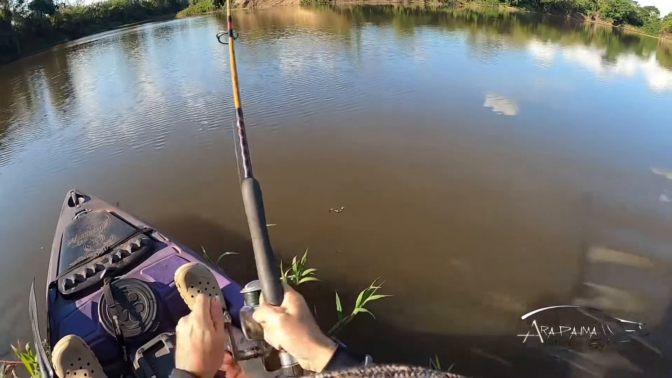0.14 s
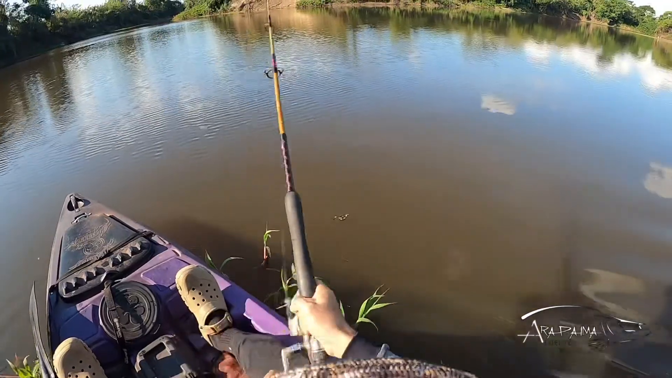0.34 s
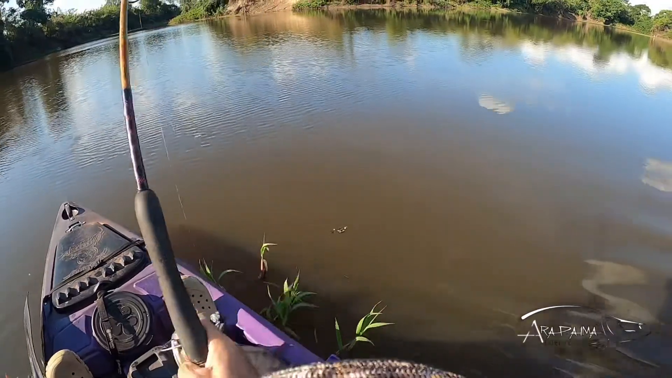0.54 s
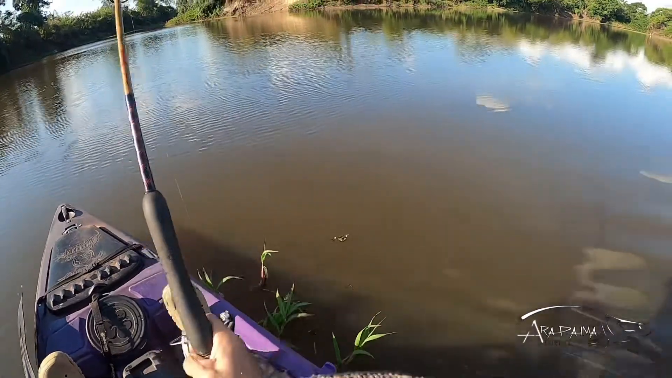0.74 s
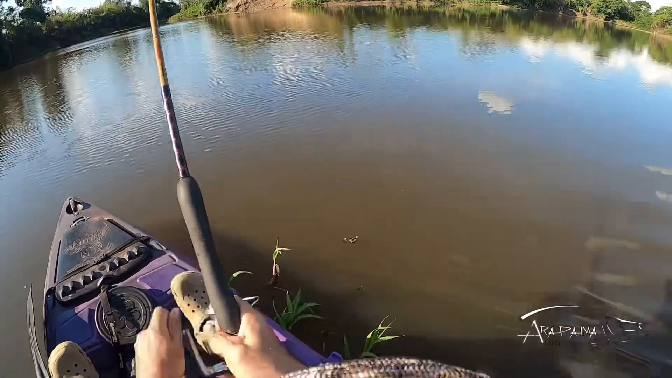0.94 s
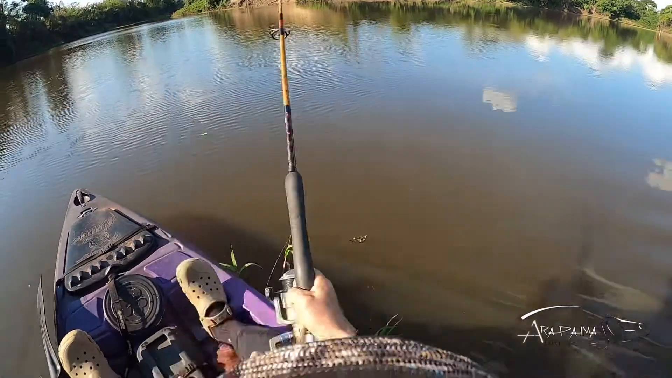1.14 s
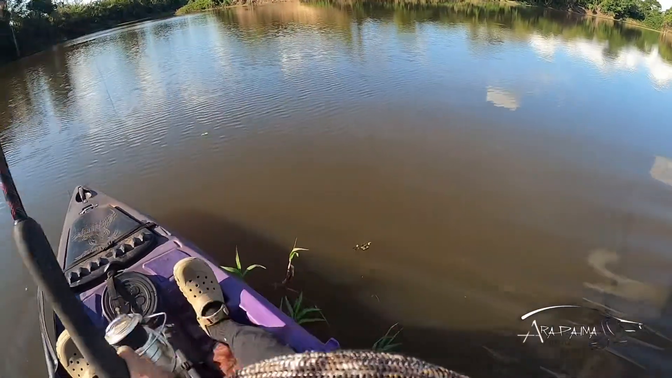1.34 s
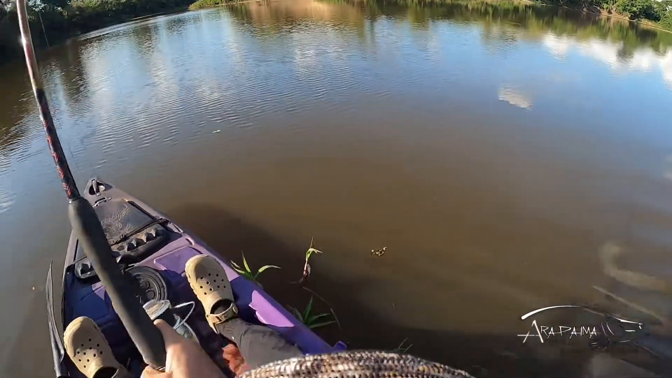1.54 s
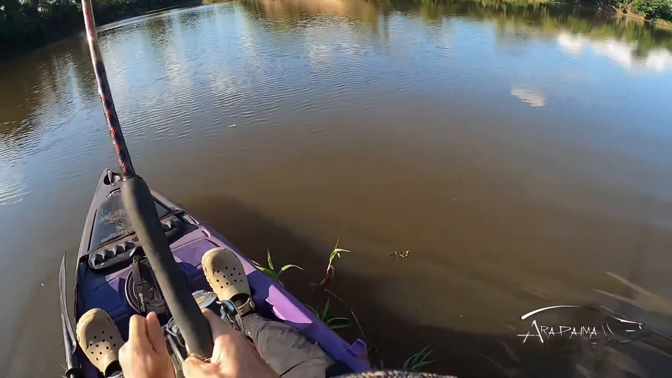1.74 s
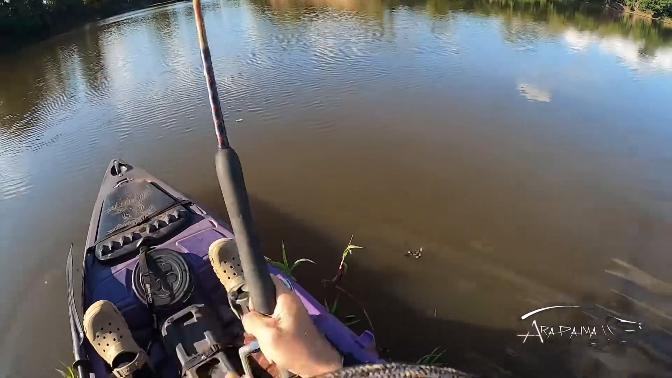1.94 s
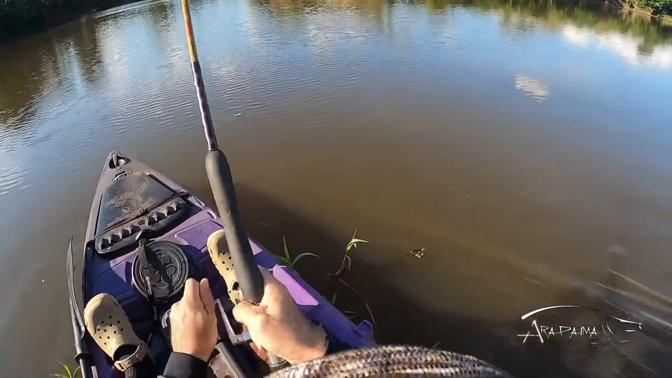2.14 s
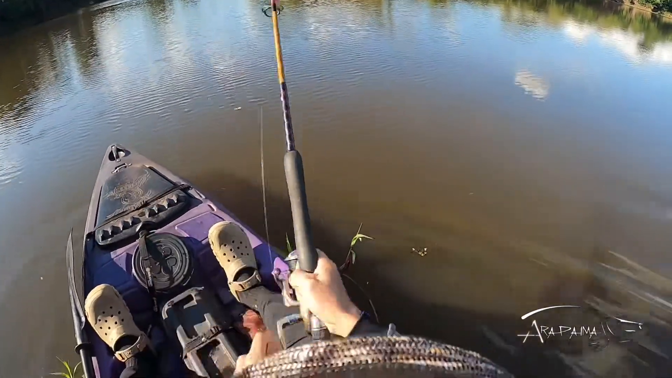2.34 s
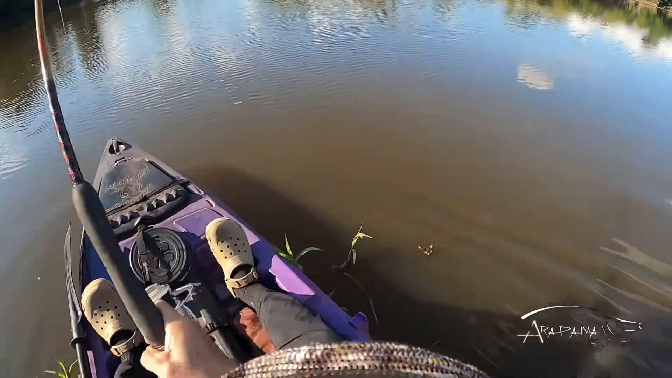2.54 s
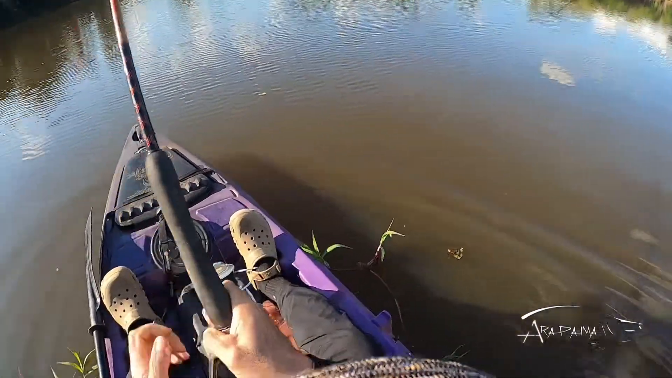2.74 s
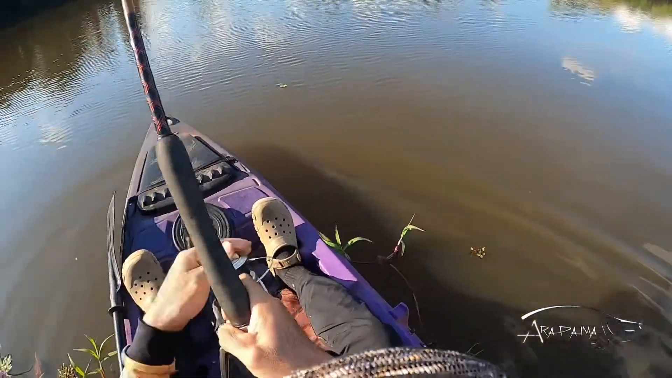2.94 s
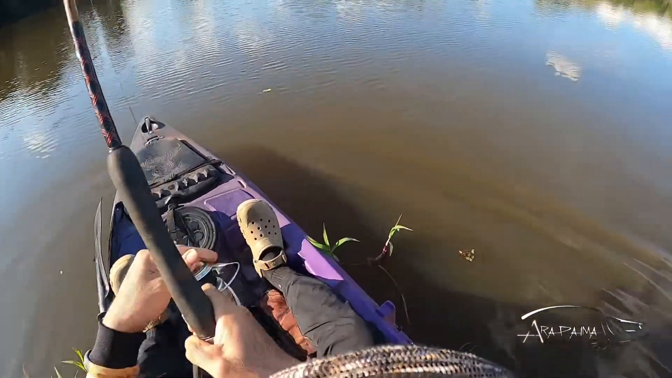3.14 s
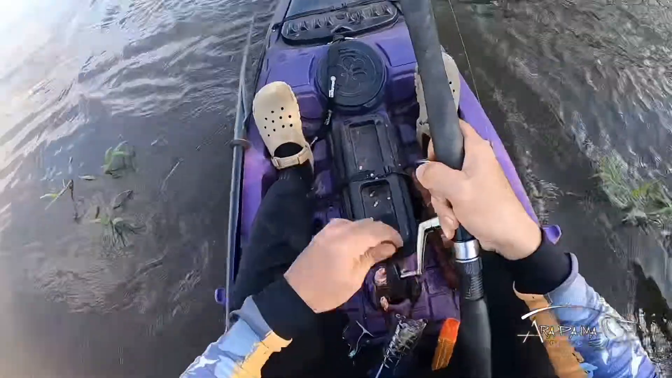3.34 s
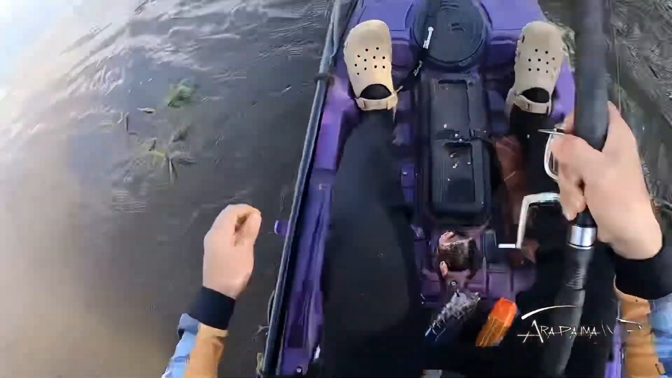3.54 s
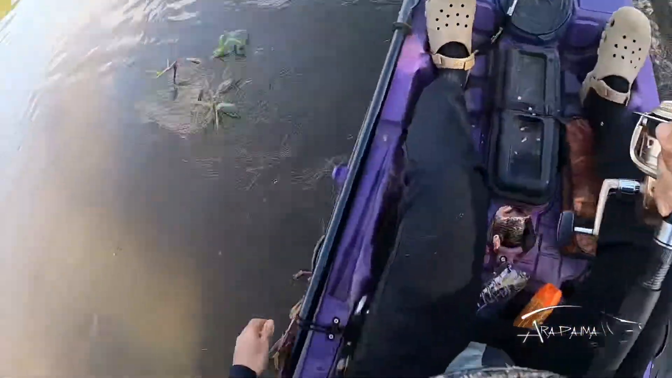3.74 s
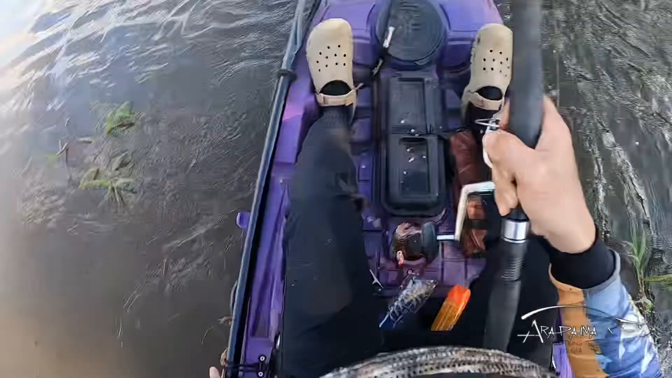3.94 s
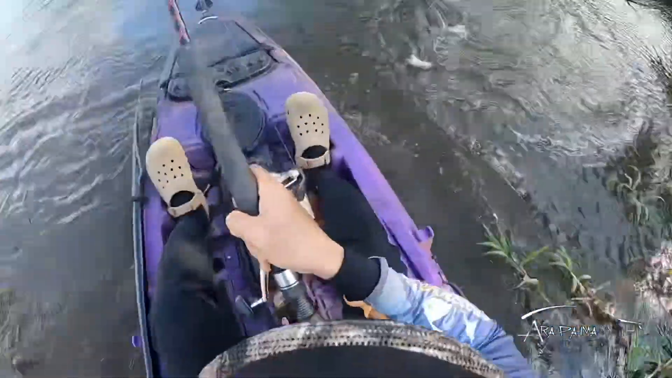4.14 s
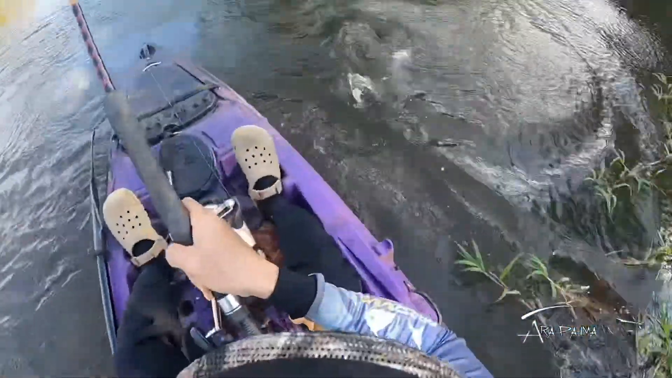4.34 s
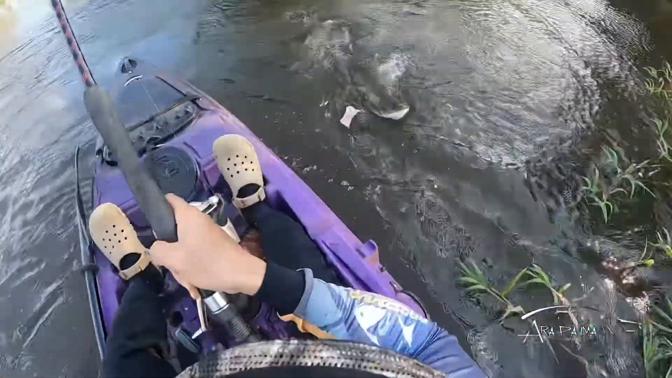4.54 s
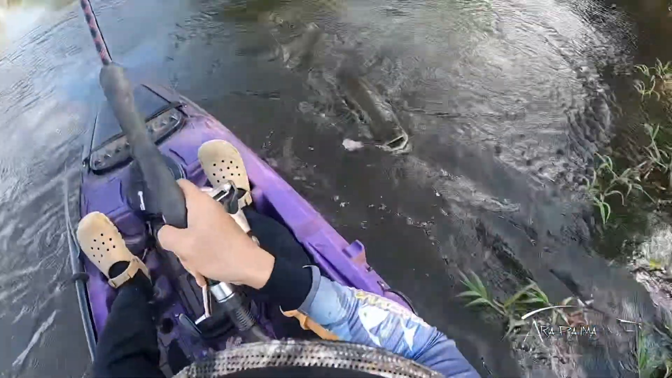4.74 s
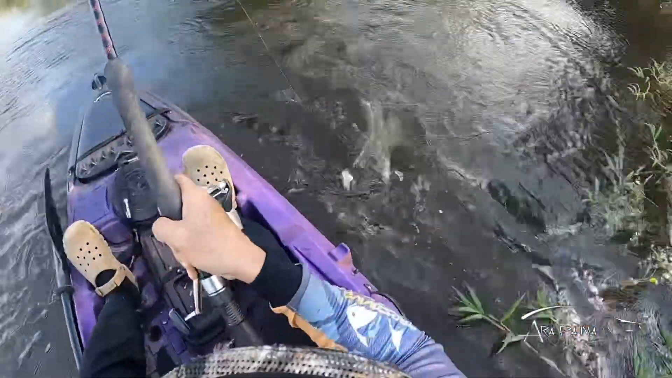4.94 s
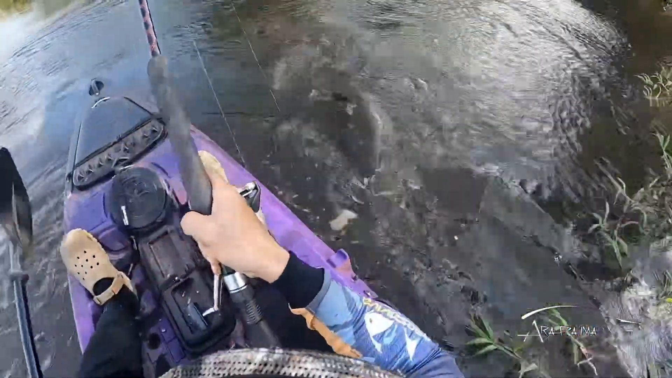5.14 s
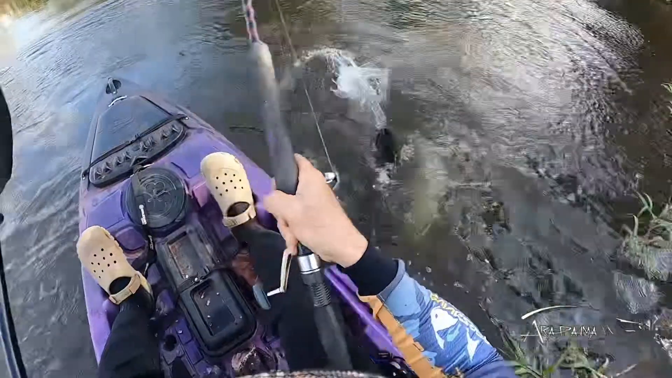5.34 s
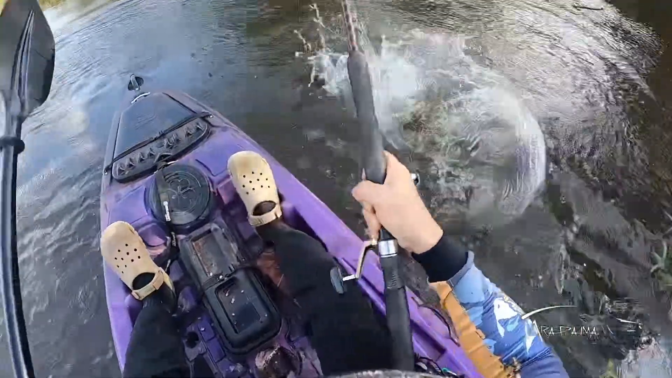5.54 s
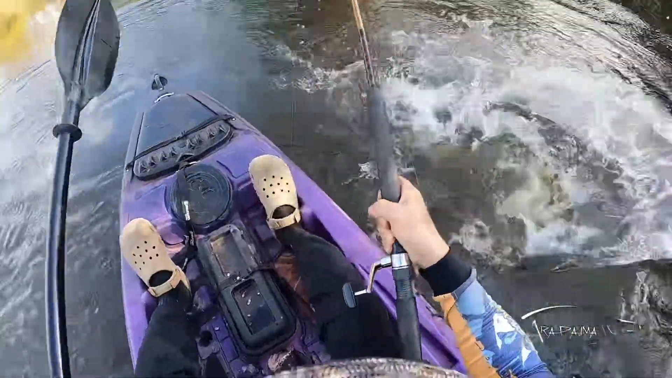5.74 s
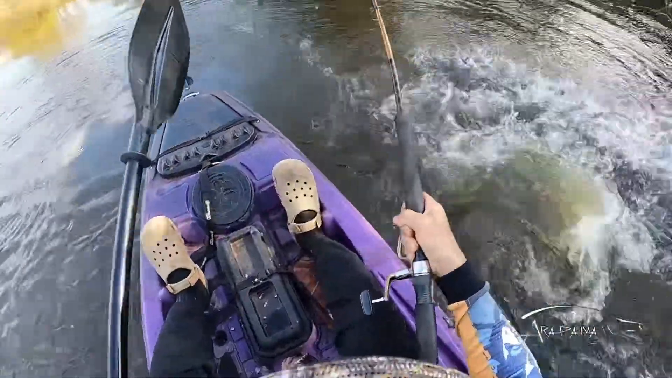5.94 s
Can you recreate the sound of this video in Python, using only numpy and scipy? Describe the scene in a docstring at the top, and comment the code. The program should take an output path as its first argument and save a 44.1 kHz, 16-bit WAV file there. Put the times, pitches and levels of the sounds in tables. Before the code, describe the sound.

An angler's hands work a reel very near the microphone: grainy rattling, tackle knocks, small creaky squeaks and cloth rubbing over a barely audible river wash. After some metal ticking, a low bump and a few splashes arrive. A large fish rolls beside the plastic hull with plops, clear droplets and dull thumps, then thrashes loudly in dense bubbling spray, slightly to the right.

```python
"""Calm river, kayak: an angler winds a reel, then a big hooked fish rolls and thrashes beside the hull.
Reel: random tooth clicks through body resonances; squeaks are gliding sines. Cloth: shaped, flickering noise.
Tackle knocks: noise crack plus dying ring. Metallic ticks, small bright knocks: scrapes that ring a bank of modes.
Fish: low noise sloshes, swarms of rising sines bubble, grains spray; gulps, thumps, slaps are gliding sines.
Drops: cracks with rising rings, clear plinks, ringless spits. Below all: a faint river wash and low rumble."""
import sys
import numpy as np
from scipy import signal
from scipy.fft import rfft, irfft, next_fast_len
from scipy.io import wavfile
from scipy.ndimage import uniform_filter1d

SR = 44100
rng = np.random.default_rng(int(sys.argv[2]) if len(sys.argv) > 2 else 0)


def master_out(mix):
    """Clip the mix to full scale and print it as 16-bit PCM to the path in sys.argv[1]."""
    frames = np.transpose(np.atleast_2d(mix))
    ceiling = np.clip(frames, -1, 1)
    pcm = np.round(ceiling * 32767).astype(np.int16)
    wavfile.write(sys.argv[1], SR, pcm)


N = 268039


def amp(db):
    """Gain of a level in dB."""
    return 10 ** (np.asarray(db) / 20)


def rms_one(x):
    """Scale to unit rms."""
    return x / np.sqrt(np.mean(x ** 2) + 1e-20)


def gains(rows):
    """Gain in time of every dB column; -120 dB outside, but a table that ends after 6 s holds its last level."""
    t_s, *columns = np.transpose(rows)
    now_s = np.arange(N) / SR
    return [amp(np.interp(now_s, t_s, db, left=-120, right=db[-1] if t_s[-1] > 6 else -120))
            for db in columns]


def swells(times_s, levels_db, attack_s, t60_s):
    """Gain in time of events that rise linearly and die exponentially; the strongest wins."""
    out, t = np.zeros(N), np.arange(SR) / SR
    shape = np.minimum(t / attack_s, 1) * amp(-60 * np.maximum(t - attack_s, 0) / t60_s)
    for t_s, level_db in zip(times_s, levels_db):
        i = round(max(t_s, 0) * SR)
        out[i:i + SR] = np.maximum(out[i:i + SR], amp(level_db) * shape[:N - i])
    return out


def drift(rate_hz):
    """Slow random wander of unit rms: noise through a double real pole, drawn at SR / 20."""
    r = np.exp(-40 * np.pi * rate_hz / SR)
    noise = rng.standard_normal(N // 20 + 4002)
    slow = signal.lfilter([1], [1, -2 * r, r * r], noise)[4000:]
    return np.interp(np.arange(N) / 20, np.arange(len(slow)), rms_one(slow))


def resonate(x, hz, width_hz):
    """Two-pole resonance, about unit gain at its peak."""
    r = np.exp(-np.pi * width_hz / SR)
    zeros = np.array([1, 0, -1]) * (1 - r * r) / 2
    return signal.lfilter(zeros, [1, -2 * r * np.cos(2 * np.pi * hz / SR), r * r], x)


def grains(per_s, spread_db):
    """Random clicks of uneven size and either sign."""
    sizes = amp(spread_db * np.minimum(rng.exponential(1, N), 5)) * rng.choice([-1, 1], N)
    return sizes * (rng.random(N) < per_s / SR) + 1e-18


def coloured(source, spectrum):
    """A source shaped by a spectrum, interpolated in dB over log f."""
    hz, level_db = np.transpose(spectrum)
    size = next_fast_len(N)
    bins_hz = np.arange(size // 2 + 1) * SR / size
    colour = amp(np.interp(np.log(bins_hz + 1), np.log(hz), level_db, -120, -120))
    return irfft(rfft(source, size) * colour, size)[..., :N]


def patchy(source, spectrum, patchy_db, rate):
    """A coloured source split in bands that flicker partly together, partly alone; rms 1."""
    source = coloured(source, spectrum)
    low_hz, high_hz = spectrum[0][0], spectrum[-1][0]
    edges_hz = low_hz * 2 ** np.arange(0, np.log2(high_hz / low_hz) + .7, .7)
    together, out = drift(rate), 0
    for k, (low, high) in enumerate(zip(edges_hz, edges_hz[1:])):
        sos = signal.butter(2, [low, min(high, .45 * SR)], "band", fs=SR, output="sos")
        band = signal.sosfilt(sos, source)
        flicker = amp(patchy_db * (.5 * together + drift(rate)))
        out = out + (-1) ** k * band * flicker   # alternate signs join the bands flat
    return rms_one(out)


def place(x, pan_db, lag_s, side=0):
    """Two close ports: L-R level step, left delayed, side part in opposite sign."""
    late = np.interp(np.arange(N) - lag_s * SR, np.arange(N), x)
    return np.array([(late + side) * amp(pan_db / 2), (x - side) * amp(-pan_db / 2)])


def glides(table):
    """Sines that swell, die and slide; they stop after 1/9 s, or sooner after a climb of 2.4 octaves."""
    out, t = np.zeros(N + SR), np.arange(SR // 9) / SR
    for t_s, swell_s, t60_s, first_hz, rise, level_db in table:
        turns = np.cumsum(first_hz * 2 ** (rise * t)) / SR
        stop_s = min(t[-1], 2.4 / max(rise, 1))
        shape = np.minimum(t / swell_s, 1) * amp(-60 * np.maximum(t - swell_s, 0) / t60_s)
        shape = shape * np.clip((stop_s - t) / 0.014, 0, 1)
        out[round(max(t_s, 0) * SR):][:len(t)] += amp(level_db) * shape * np.sin(2 * np.pi * turns)
    return out[:N]


def hits(table, rise, rough, crack_t60, crack_width, swell, snap):
    """Each hit is a short noise crack and a dying ring; a ring of air in water rises in pitch."""
    out, t = np.zeros((2, N)), np.arange(SR // 12) / SR
    noise = rng.standard_normal((len(table), 3, len(t)))
    for (t_s, level_db, ring_hz, t60_s, crack_db, crack_hz, pan_db), (a, *b) in zip(table, noise):
        tone = np.sin(2 * np.pi * np.cumsum(ring_hz * 2 ** (rise * t)) / SR)
        grit = rms_one(resonate(resonate(a, ring_hz, ring_hz), ring_hz, ring_hz))
        body = (tone + rough * grit) / (1 + rough)
        body = body * amp(-60 * t / max(t60_s, .005)) * np.minimum(t / swell, 1)

        crack = b[0] + .5 * np.array(b)   # partly shared by the ports
        crack = crack * amp(-60 * t / crack_t60) * np.minimum(.3 + t / .002, 1)
        crack[:, 0] += snap   # first contact
        crack = resonate(resonate(crack, crack_hz, crack_hz), crack_hz, crack_width * crack_hz)
        crack = amp(crack_db) * crack / np.abs(crack).max()

        burst = amp(level_db) * (body + crack) * amp([[pan_db / 2], [-pan_db / 2]])
        i, lag = round(t_s * SR), round(-pan_db / 2)   # lag in samples: the weaker port hears it later
        out[0, i + lag:][:len(t)] += burst[0]
        out[1, i:][:len(t)] += burst[1]
    return out


# quiet river all around: f/Hz, relative level/dB per Hz
RIVER_SPECTRUM = [(65, -52), (110, -12), (167, 7.5), (223, -2), (480, -7), (683, -19), (1040, -32),
                  (4810, -10), (7700, -11.5), (11000, -23.5), (15700, -28)]


def river():
    """Steady faint noise wash, mostly alike in both ports."""
    shared, own = rms_one(coloured(rng.standard_normal((2, N)), RIVER_SPECTRUM)) * amp(-69.5)
    return place(shared, pan_db=-1.5, lag_s=0, side=np.diff(own, prepend=0) * amp(-4.0))


# air and hull movement on the ports: t/s, level/dB
RUMBLE_LEVEL = [(0.0, -78), (0.03, -57), (0.2, -53), (0.5, -57.5), (0.74, -55), (.95, -58), (1.12, -71),
                (1.3, -46), (1.44, -41), (1.6, -67), (1.85, -78), (2.0, -58), (2.25, -78), (2.38, -57),
                (2.55, -54), (2.74, -52), (2.89, -73), (3.17, -71), (3.35, -45), (3.38, -48), (3.49, -31),
                (3.54, -49), (3.93, -43), (3.99, -23), (4.11, -36.5), (4.2, -32), (4.33, -59), (4.57, -40),
                (4.62, -55), (4.72, -59), (4.81, -43), (5.23, -62), (5.37, -53), (5.52, -65), (6.08, -64)]
# independent 45-95 Hz part in each port, before scaling: t/s, level/dB
HULL_SHARE = [(3.8, -18), (4.3, -7.5), (6.08, -5)]


def rumble():
    """Lumpy low pressure; its lowest band is partly shared and stronger on the right."""
    lumps = rng.standard_normal((2, N)) * amp(5.3 * drift(15.0))
    low = signal.sosfilt(signal.butter(4, [27, 49], "band", fs=SR, output="sos"), lumps)
    low = np.array([low[0] * amp(-10.0), .5 * low[0] + .87 * low[1]])
    hull = signal.sosfilt(signal.butter(2, [45, 95], "band", fs=SR, output="sos"), lumps)
    low = low + hull * gains(HULL_SHARE)[0]
    return gains(RUMBLE_LEVEL)[0] * low / np.std(low.mean(axis=0))


# tackle knocks: t/s, ring level/dB, ring f/Hz, ring t60/s, crack re ring/dB, crack f/Hz, L-R/dB
TACKLE_KNOCKS = [(0.146, -38, 1250, 0.029, 5, 4440, -3), (0.217, -25, 1290, 0.027, -1, 2200, 0.5),
                 (0.435, -32.5, 1330, 0.0099, 9.5, 4640, 0.5), (0.49, -39, 1055, 0.057, -2, 3160, -1),
                 (0.725, -21, 1080, 0.0079, -11.5, 2300, 1), (0.7602, -34.5, 1185, 0.055, -8, 2660, 3),
                 (0.821, -22, 1170, 0.017, -11, 1920, 1), (0.852, -24.5, 1380, 0.011, -30, 2460, 3),
                 (0.883, -33, 1360, 0.061, -21, 2660, -3), (0.89, -23.5, 921, 0.097, -5, 2480, -1.5),
                 (1.023, -32, 1040, 0.036, -15, 2340, -1), (1.168, -36, 880, 0.078, 5, 2510, -3),
                 (1.273, -28, 1360, 0.031, 6, 5860, 1), (1.29, -21, 1150, 0.072, -14, 2100, 2),
                 (1.296, -19, 1108, 0.083, -15, 2030, -0.5), (1.522, -16.5, 1430, 0.011, -21, 2020, 2),
                 (1.539, -37.5, 1250, 0.044, -4, 2670, 3), (1.902, -51, 1360, 0.05, 13, 2750, -1),
                 (1.99, -35.5, 1370, 0.048, 0, 4100, 0.5), (2.031, -33.5, 1210, 0.026, 1, 2700, -1.5),
                 (2.097, -34.5, 1220, 0.021, -18, 2300, 0.5), (2.155, -37.5, 1250, 0.21, 1, 2300, 1),
                 (2.373, -30.5, 1740, 0.02, 4.5, 3800, -0.5), (2.524, -27.5, 950, 0.022, -2.5, 3000, -0.5),
                 (2.702, -40, 1200, 0.03, 2.5, 2400, 3), (2.73, -18, 1040, 0.0058, -17, 2100, 2.5),
                 (3.262, -42.5, 1320, 0.027, 8, 4000, -4.5), (3.378, -30.5, 1110, 0.065, 2.5, 4400, -3),
                 (3.4036, -36.5, 1030, 0.05, 16.5, 6370, -3), (3.52, -32.5, 1550, 0.034, -24, 2130, 3),
                 (3.69, -24, 1510, 0.02, -5, 2570, -2), (3.723, -29, 1250, 0.033, -4.5, 3040, -2.5),
                 (3.769, -29, 934, 0.078, -24, 2190, -3.5), (3.83, -33.5, 1053, 0.089, -22, 2040, -3)]


def knocks():
    """Tackle knocks: hard contact cracks, then a rough ring of steady pitch dies."""
    return hits(TACKLE_KNOCKS, rise=0, rough=0.56, crack_t60=0.021, crack_width=0.78, swell=0.00026, snap=8.1)


# winding, before mix trims: t/s, whirr level/dB, rustle level/dB, rub level/dB
WINDING = [(0.0, -53, -39, -61.5), (0.16, -38.5, -48, -56), (0.4, -47, -48, -57.5), (0.55, -48, -48, -54),
           (0.79, -60, -62.5, -65), (0.95, -45, -49.5, -54.5), (1.28, -46.5, -47.5, -49),
           (1.4, -54, -53, -48), (1.58, -52, -58.5, -56), (1.78, -50, -48, -59), (2.12, -46.5, -50, -58),
           (2.35, -44.5, -47.5, -56), (2.56, -47, -52.5, -50.5), (2.68, -61, -54, -59),
           (2.83, -44, -51.5, -52), (3.03, -55.5, -75, -67.5), (3.31, -108, -55, -72.5),
           (3.44, -65, -60, -67), (3.6, -40, -43, -58), (3.76, -43, -46, -55), (3.87, -57, -78, -61)]
# rod jerks shake reel and cloth, before mix trims: t/s, reel level/dB, cloth level/dB
ROD_JERKS = [(0.0, -57, -57), (.21, -53, -42), (.43, -76, -59), (0.853, -31, -64), (1.283, -31, -36),
             (2.505, -53, -47), (3.256, -43.5, -43), (3.379, -66, -40.5), (3.62, -41, -58)]


def hand_levels():
    """Gains of whirr, rub and rustle: winding plus jerks; every knock also thumps the cloth."""
    whirr, rustle, rub = gains(WINDING)
    t_s, reel_db, cloth_db = np.transpose(ROD_JERKS)
    shaken = swells(t_s, reel_db, attack_s=0.016, t60_s=0.32)
    jerked = swells(t_s, cloth_db, attack_s=0.016, t60_s=0.32)
    t_s, knock_db = np.transpose(TACKLE_KNOCKS)[:2]
    thumped = swells(t_s, knock_db - 22, attack_s=0.0035, t60_s=0.069)
    return whirr + shaken, rub + shaken * amp(-8.5) + thumped, rustle + jerked


# reel body resonances: f/Hz, width/Hz, relative level/dB
REEL_BODY = [(1240, 350, 19), (1000, 420, 8.5), (1187, 34, 14), (1318, 46, 23.5), (1670, 39, 12),
             (2540, 880, 5.5), (2596, 48, 9.5), (4140, 270, 2.5), (8000, 670, -29)]
# low cloth rub: f/Hz, relative level/dB per Hz
RUB_SPECTRUM = [(90, -35), (125, -9), (160, 0.5), (260, -1.5), (500, -1), (800, -7.5), (1100, -4)]
# high cloth rustle: f/Hz, relative level/dB per Hz
RUSTLE_SPECTRUM = [(700, -12), (1300, 11), (2000, 8.5), (4070, 2), (5540, -0.5), (7600, -5), (9000, -11.5),
                   (12300, -22.5), (15800, -45)]
# reel under load: t/s, t60/s, first f/Hz, rise/(octave/s), level/dB before panning
REEL_SQUEAKS = [(.0, 0.079, 3660, 2.5, -43), (.0, 0.071, 1060, 8.5, -38), (0.02, 0.17, 1203, 2, -38.5),
                (0.018, 0.13, 1275, 10, -37), (.025, 0.04, 2740, 4, -39.5), (0.164, 0.079, 1640, 7, -40.5),
                (.235, 0.45, 1037, 3, -37), (.258, 0.11, 2660, 1.5, -43), (.275, 0.06, 1072, 1, -28),
                (0.279, 0.065, 2685, -1.5, -42.5), (.285, .07, 1530, 4, -40), (.303, 0.051, 2690, 0.5, -45),
                (.315, 0.07, 1314, -0.5, -39), (0.339, 0.043, 1196, -1, -43),
                (.758, 0.049, 1184, -1.5, -34), (0.859, 0.081, 1500, 0.5, -29.5),
                (0.876, 0.1, 1428, -0.8, -28.5), (0.885, 0.08, 845, 2.5, -22.5),
                (1.29, 0.03, 1265, 6, -20.5), (1.808, 0.017, 3020, 5.5, -38.5),
                (1.808, 0.026, 1580, 2, -40), (1.935, 0.014, 1830, 4, -41),
                (2.262, 0.055, 1200, 4.5, -35.5), (2.261, 0.07, 2565, 3.5, -42.5),
                (2.645, 0.034, 1215, 0, -42), (2.966, 0.062, 1440, 0.5, -48), (3.461, 0.028, 1660, 7, -41)]


def hands():
    """Gear teeth rattle the reel body, which squeaks under load; cloth rubs low and rustles high."""
    whirr, rub, rustle = hand_levels()
    teeth = grains(1200 * amp(5.0 * drift(14)), 0.51)
    reel = 0
    for k, (hz, width_hz, db) in enumerate(REEL_BODY):
        mode = resonate(resonate(teeth, hz, 3 * width_hz), hz, width_hz)
        reel = reel + (-1) ** k * amp(db) * mode
    reel = rms_one(reel)
    cloth = patchy(rng.standard_normal(N), RUB_SPECTRUM, patchy_db=4.0, rate=33.0)
    rustling = [grains(5000, 2.23), grains(7900, 5.97)]
    bright, around = rustle * patchy(rustling, RUSTLE_SPECTRUM, patchy_db=3.0, rate=24.0)
    squeaks = glides([(t_s, 0.0092, t60_s, hz, rise, db) for t_s, t60_s, hz, rise, db in REEL_SQUEAKS])

    turned = np.interp(np.arange(N) / SR, [3.2, 3.251], [0, 1])   # the reel swings to the right
    near = whirr * reel * amp(-5.0) + rub * cloth * amp(-6.0 * turned) + bright * amp(3.0) + squeaks
    side = np.diff(around, prepend=0) * amp(-18.5) + around * amp(-27.0)
    return place(near, pan_db=1.73 - 5.7 * turned, lag_s=5.5e-5 * turned, side=side)


# modes of the metal: f/Hz, relative level/dB, t60/s
METAL_MODES = [(4060, -1, .024), (4600, -4, .016), (5310, 0, .018), (6580, -4, .04), (7200, -4, .014),
               (7620, -6, .018), (8500, -8, .012), (10700, -9, .014), (12300, -11, .012)]
# metallic ticks and small bright knocks of reel and tackle:
# t/s, level/dB, f of the mode struck hardest/Hz, scrape re ring/dB
BRIGHT_TICKS = [(.802, -47, 5310, 3), (1.2445, -43, 8000, 6), (2.11, -43, 4060, -6), (2.484, -40, 4600, 0),
                (2.7846, -31, 6580, -20), (2.8, -28.5, 4900, -1), (2.8224, -40, 7620, -9),
                (2.829, -27, 4060, -14), (2.8455, -31, 4060, -10), (2.8547, -35, 6580, -3),
                (2.8656, -34, 4060, -12), (2.887, -39, 7500, 1), (2.8986, -37, 5310, 2),
                (2.909, -33, 6580, -20), (2.9245, -32, 6000, 0.5), (2.9424, -36, 5310, 2),
                (2.9588, -30, 5800, -4.5), (3.0207, -41.5, 7050, 6), (3.0535, -44, 6000, -7),
                (3.383, -28.5, 4600, -1)]
# metallic buzz between ticks: t/s, level/dB
METAL_CHATTER = [(2.79, -62), (2.805, -57), (2.85, -51), (2.9, -62)]


def ticks():
    """A tiny scrape rings the modes, most near the struck one; tackle knocks ring them too, and they buzz."""
    out, t = np.zeros(N), np.arange(SR // 12) / SR
    shaken = [(t_s, db + min(crack_db, 0) - 14, 1.5 * hz, -40)
              for t_s, db, _, _, crack_db, hz, _ in TACKLE_KNOCKS]
    table = BRIGHT_TICKS + shaken
    strengths_db = rng.normal(0, 4, (len(table), len(METAL_MODES)))
    scrapes = rng.standard_normal((len(table), len(t)))
    rough = .5   # uneven damping
    for (t_s, level_db, struck_hz, scrape_db), chances_db, scrape in zip(table, strengths_db, scrapes):
        rings = 0
        for (hz, db, t60_s), chance_db in zip(METAL_MODES, chances_db):
            far_db = 30 * abs(np.log2(hz / struck_hz))
            decay = amp(db + chance_db - far_db - 60 * t / t60_s)
            detuned_hz = hz * (1 + .012 * np.sin(chance_db))   # pitch shifts from blow to blow
            rings = rings + decay * np.sin(2 * np.pi * detuned_hz * t)
        unevenness = rms_one(uniform_filter1d(scrape[::-1], size=60))
        rings = rings / np.abs(rings).max() * (1 + rough * unevenness) / (1 + rough)
        rings = rings * np.minimum(t / 0.00099, 1)
        scraping = resonate(scrape * amp(-60 * t / 0.013), 5200, 3300) * amp(scrape_db)
        out[round(t_s * SR):][:len(t)] += amp(level_db) * (rings + scraping)

    clicks = grains(900, 3.6)
    buzz = sum(amp(db) * resonate(resonate(clicks, hz, hz / 2), hz, 4 / t60_s)
               for hz, db, t60_s in METAL_MODES[:7])
    out += gains(METAL_CHATTER)[0] * rms_one(buzz)
    return place(out, pan_db=2.0, lag_s=1e-5)


# clear single droplets: t/s, f/Hz, level/dB before panning
CLEAR_DROPLETS = [(3.672, 600, -43), (3.73, 1210, -38), (3.772, 1520, -37), (4.15, 2200, -42),
                  (4.172, 2370, -30.5), (4.192, 3880, -34), (4.305, 2440, -41), (4.356, 1060, -39.5),
                  (4.44, 1170, -36), (4.58, 3480, -37), (4.686, 920, -38), (4.697, 4130, -32),
                  (4.732, 2490, -31), (4.762, 3620, -44), (4.766, 3200, -42), (4.802, 2280, -40),
                  (4.83, 767, -37.5), (4.937, 940, -37), (4.955, 910, -39), (4.977, 3950, -34.5),
                  (4.988, 2030, -43), (4.995, 2180, -28), (5.018, 5450, -36.5), (5.048, 2350, -39),
                  (5.08, 1560, -42), (5.177, 2750, -33), (5.191, 2440, -37), (5.206, 1220, -38),
                  (5.252, 920, -38), (5.268, 2560, -32), (5.286, 4330, -31), (5.517, 3530, -27),
                  (5.523, 1410, -31), (5.527, 2510, -30), (5.545, 990, -29), (5.571, 1020, -23),
                  (5.588, 757, -15.5), (5.673, 2550, -36), (5.69, 640, -25), (5.729, 1470, -17.5),
                  (5.748, 1920, -30), (5.848, 1074, -19.5), (5.945, 4400, -27), (5.978, 2400, -25),
                  (5.994, 3920, -30), (6.013, 4700, -24.5)]


def plinks():
    """Clear droplets: sines that rise 3.2 octaves/s; low ones ring longer, 70 cycles of t60 at 2 kHz."""
    rows = [(t_s, 0.003, 70 / np.sqrt(2000 * hz), hz, 3.2, db) for t_s, hz, db in CLEAR_DROPLETS]
    return place(glides(rows), pan_db=-1.5, lag_s=4e-5)


# fine drops that only tick: t/s, level/dB before panning, f/Hz
FINE_DROPS = [(4.097, -18.5, 8500), (4.16, -39, 6000), (4.195, -42, 4500), (4.279, -34, 5500),
              (5.037, -40, 7000), (5.082, -38, 5970), (5.1255, -25, 8450), (5.129, -33, 6500),
              (5.17, -34, 3500), (5.18, -27, 8000), (5.213, -31, 4530), (5.219, -35, 6000),
              (5.243, -35, 6000), (5.252, -35, 5000), (5.272, -37, 4000), (5.293, -32, 6000),
              (5.328, -20, 4500)]


def spits():
    """Each fine drop is a bright crack; its ring lies 40 dB below."""
    rows = [(t_s, db - 40, 1000, .01, 40, hz, -3) for t_s, db, hz in FINE_DROPS]
    return hits(rows, rise=0, rough=0, crack_t60=0.0094, crack_width=0.3, swell=0.001, snap=1.5)


# drops and slaps on water: t/s, ring level/dB, ring f/Hz, ring t60/s, crack re ring/dB, crack f/Hz, L-R/dB
WATER_DROPS = [(3.882, -22, 1200, 0.029, -12, 3950, -2.5), (3.887, -21, 1190, 0.028, -14, 3620, 0.5),
               (3.903, -28, 1180, 0.033, -21, 3120, 2), (4.033, -32.5, 1820, 0.047, -29, 3160, -7),
               (4.097, -14.5, 4100, 0.01, -6.5, 3800, -3.5), (4.103, -20.5, 2260, 0.03, -21, 3460, -4.5),
               (4.152, -31, 1047, 0.11, -12, 4350, -3), (4.169, -17, 1035, 0.014, -17, 3890, -2.5),
               (4.175, -29, 1700, 0.042, -21, 3110, -5), (4.232, -35, 2280, 0.024, -17, 3700, -3),
               (4.295, -29.5, 840, 0.016, -11, 8300, -2), (4.342, -40.5, 1060, 0.036, 11, 4800, -3.5),
               (4.475, -29, 1610, 0.028, 5, 4570, -3), (4.513, -21, 1116, 0.057, -13, 3490, 3),
               (4.544, -24, 2000, 0.019, -8, 3050, 1.5), (4.577, -27, 2050, 0.034, 2.5, 3700, -1),
               (4.656, -32, 1390, 0.018, 0, 4460, 3), (4.695, -24, 2950, 0.015, -25, 4200, -1.0),
               (4.732, -24, 900, 0.032, -5, 3000, -3), (4.762, -32.5, 970, 0.042, 2.5, 3570, -1),
               (4.803, -29.5, 1520, 0.022, -12, 3130, -1), (4.843, -25.5, 3550, 0.014, -18, 3500, -3),
               (4.971, -22, 800, 0.024, -9, 3760, -2.5), (4.997, -13.5, 1490, 0.022, -29, 3710, -2.5),
               (5.019, -26.5, 1640, 0.026, 2, 3180, -3.5), (5.12, -25.5, 2260, 0.019, -18, 3240, -3),
               (5.143, -20.5, 2800, 0.015, -26, 3010, -2.5), (5.173, -24, 1150, 0.024, -4.5, 3000, -2.5),
               (5.198, -31, 1350, 0.015, 0, 3730, -1), (5.239, -35, 2210, 0.028, -10, 3170, -1),
               (5.258, -28.5, 2390, 0.04, -25, 3370, 1.5), (5.289, -29, 1070, 0.034, 5, 4370, -3.5),
               (5.302, -25, 2170, 0.029, -7, 8000, -1), (5.341, -14, 900, 0.021, 1, 3960, -1),
               (5.433, -17, 1680, 0.025, 0, 3700, -0.5), (5.462, -11.5, 816, 0.042, -29, 3420, -1),
               (5.599, -12.5, 1075, 0.059, -28, 3020, -2.5), (5.644, -16.5, 1540, 0.027, 3, 4430, -7),
               (5.77, -13.5, 1160, 0.089, -13, 4000, -4), (5.973, -11.5, 1050, 0.035, -4, 3250, -7)]


def drops():
    """Drops and slaps crack on the water; the enclosed air rings and rises in pitch."""
    return hits(WATER_DROPS, rise=10.8, rough=0.46, crack_t60=0.013, crack_width=0.74, swell=0.00057, snap=1.9)


# pockets at an even level: t/s, length/s, first f/Hz, rise/(octave/s), level/dB before panning
EVEN_POCKETS = [(4.031, 0.044, 222, 20, -27.5), (4.08, 0.04, 454, 17.5, -39.5),
                (4.225, .087, 174.4, 27.5, -36.5), (5.474, .02, 378, -7, -15.5)]


def bursts():
    """Singing air pockets burst: sines swell, hold, slide in pitch and stop short."""
    out = np.zeros(N)
    for t_s, length_s, first_hz, rise, level_db in EVEN_POCKETS:
        t = np.arange(round(length_s * SR)) / SR
        shape = np.clip(np.minimum(t / 0.0043, (length_s - t) / 0.0033), 0, 1)
        turns = np.cumsum(first_hz * 2 ** (rise * t)) / SR
        out[round(t_s * SR):][:len(t)] += amp(level_db) * shape * np.sin(2 * np.pi * turns)
    return out


STIRRED_S = 3.27   # the fish nears the hull


def bubbling(cycles, low_hz, octaves, rise, tilt_db, spread_db, count, start_s=STIRRED_S):
    """Bubbles ring a few cycles and rise in pitch as they near the surface; larger ones are louder."""
    out, t = np.zeros(N + 1000), np.arange(1000) / SR
    start = SR * start_s
    for when, size, climb, luck in rng.random((count, 4)):
        hz = low_hz * 2 ** (octaves * size)
        turns = hz * t * (1 + rise * climb * hz * t)
        level_db = tilt_db * octaves * size - spread_db * np.log(luck + 0.46)
        bubble = amp(level_db - 60 * t * hz / cycles) * np.sin(2 * np.pi * turns)
        out[round(start + when * (N - start)):][:1000] += bubble
    return out[:N] / np.std(out[round(start):])


# fish rolls, before mix trims: t/s, slosh level/dB, bubbling level/dB, spray level/dB
FISH_ROLLS = [(3.874, -12, -28.5, -76), (4.041, -24, -74, -85), (4.1, -31, -32, -78), (4.16, -55, -59, -54),
              (4.373, -27, -57, -72), (4.419, -38, -31, -54), (4.456, -35, -28, -49.5),
              (4.506, -20.5, -50, -64), (4.658, -27.5, -76, -52), (4.868, -21.5, -59, -51),
              (4.974, -39.5, -56, -41.5), (5.12, -73, -49, -76), (5.291, -34.5, -58, -64),
              (5.329, -44, -29, -35.5), (5.43, -43, -32.5, -60), (5.47, -50, -50, -66)]
# restless water, before mix trims: t/s, bubbling level/dB, slosh level/dB
RESTLESS_WATER = [(3.27, -46.5, -58), (3.44, -56, -51), (3.7, -48, -64.5), (3.96, -55, -30),
                  (4.08, -55.5, -52), (4.25, -53, -41), (4.63, -46.5, -44), (4.83, -47.5, -37.5),
                  (5.1, -60, -48.5), (5.31, -39, -56), (5.48, -35, -27.5), (5.6, -51, -26)]
# last thrash, before lumps and mix trims: t/s, foam level/dB, slosh level/dB
LAST_THRASH = [(5.5, -42, -45), (5.586, -26.5, -33), (5.594, -25.5, -11), (5.66, -25, -24.5),
               (5.752, -23, -21), (5.774, -29.5, -15), (5.808, -23.5, -18), (6.05, -26, -31.5),
               (6.078, -22, -36)]


def fish_levels():
    """Gains of slosh, bubbling and spray: restless water, a swell at each roll, drops' spray, the thrash."""
    t_s, slosh_db, bubbling_db, spray_db = np.transpose(FISH_ROLLS)
    drop_s, drop_db = np.transpose(WATER_DROPS)[:2]
    thrown = swells(drop_s, drop_db - 38, attack_s=0.031, t60_s=0.066)
    fizz, lap = gains(RESTLESS_WATER)
    foam, thrash_slosh = gains(LAST_THRASH)
    foam = foam * amp(1.6 * drift(45))   # the thrash comes in small lumps
    slosh = lap + swells(t_s, slosh_db, attack_s=0.019, t60_s=0.22) + thrash_slosh
    bubbles = fizz + swells(t_s, bubbling_db, attack_s=0.019, t60_s=0.21) + foam
    spray = fizz * amp(-6.5) + swells(t_s, spray_db, attack_s=0.019, t60_s=0.28) + foam * amp(-6) + thrown
    return slosh, bubbles, spray


# low rolling water: f/Hz, relative level/dB per Hz
SLOSH_SPECTRUM = [(40, -77), (70, -17), (130, 2.5), (230, 3.5), (340, 1), (500, -4.5), (800, -16),
                  (1100, -15)]
# scattered spray: f/Hz, relative level/dB per Hz
SPRAY_SPECTRUM = [(700, 8), (1200, 6.5), (2200, 3), (4600, -0.5), (6600, -6.5), (8100, -5.5), (10000, -15),
                  (13000, -40), (15800, -21)]
# air pockets, low thumps and slaps:
# t/s, swell/s, t60/s, first f/Hz, rise/(octave/s), level/dB before panning
GULPS_THUMPS_SLAPS = [(3.882, 0.0039, 0.22, 272, 10, -27.5), (3.884, 0.0045, 0.6, 175, 5, -30),
                      (4.39, 0.007, 0.1, 386, 4, -39), (4.39, 0.0061, .07, 148, 2, -28),
                      (4.42, 0.0045, 0.092, 132, 2, -25), (4.52, 0.018, 0.1, 175, 10.5, -28),
                      (4.685, 0.0085, 0.17, 303, 11, -33.5), (4.875, 0.0061, 0.14, 159, -0.5, -26.5),
                      (4.925, 0.016, 0.1, 166, 1, -32), (4.513, 0.0014, 0.071, 313, 0.5, -16),
                      (4.68, 0.0042, 0.13, 182, 2.5, -26), (4.73, 0.014, 0.15, 765, 43.5, -36),
                      (4.835, 0.02, 0.26, 225, 5, -30.5), (4.88, 0.0032, 0.036, 283, 8, -22),
                      (4.893, 0.003, 0.034, 1340, 20, -34.5), (4.971, 0.0018, 0.076, 542, 16.5, -23.5),
                      (5.055, 0.0039, 0.036, 1230, 12, -28), (5.126, 0.0034, 0.14, 490, 4, -33),
                      (3.975, 0.0087, 0.081, 55.3, 5, -24.5), (4.128, 0.0055, 0.037, 70.6, 0, -23.5),
                      (4.665, 0.0042, 0.35, 58.5, 8.5, -25), (5.308, 0.0024, 0.066, 76, -3, -23.5),
                      (5.352, 0.004, 0.11, 59, -25, -22), (5.325, 0.0072, 0.0075, 1490, -4, -19.5),
                      (5.341, 0.0016, 0.013, 2260, -10, -14), (5.385, 0.0012, 0.023, 333, 11, -18.5),
                      (5.494, .004, 0.092, 296, -2.5, -22), (5.52, 0.036, 0.069, 237.5, -0.5, -13.5),
                      (5.591, 0.0025, 0.08, 200, -4, -12), (5.75, 0.013, 0.16, 720, 1, -17),
                      (5.605, 0.003, 0.039, 365, -2, -16), (5.63, 0.006, 0.037, 298, -1, -19.5),
                      (5.652, 0.0068, 0.071, 393, 6, -22.5), (5.705, 0.0081, 0.043, 160, -9, -19.5),
                      (5.79, 0.0053, 0.065, 450, 3.5, -20.5), (5.893, 0.0078, 0.12, 297, 5, -21.5),
                      (5.965, 0.006, 0.07, 199, -8, -26.5), (5.698, 0.0067, 0.037, 1170, 16, -22),
                      (5.345, 0.0048, 0.045, 784, -9.5, -20), (5.762, 0.024, 0.24, 90.1, 12, -18)]


def fish():
    """Water rolls, bubbles and sprays to the right; pockets gulp, thumps and slaps sound as gliding sines."""
    slosh, bubbles, spray = fish_levels()
    low = patchy(rng.standard_normal(N), SLOSH_SPECTRUM, patchy_db=0.0, rate=7.4) * amp(-9.0)
    middle = bubbling(cycles=36.0, low_hz=453.0, octaves=2.75, rise=0.0286,
                      tilt_db=-1.0, spread_db=4.5, count=600) * amp(-0.5)
    froth = bubbling(cycles=9.7, low_hz=532, octaves=2.57, rise=0.019,
                     tilt_db=-1.0, spread_db=0.0, count=1500, start_s=5.3) * amp(1.0)
    churned = bubbles / (bubbles + amp(-33))   # hard thrashing packs the bubbles into froth
    middle = (1 - churned) * middle + churned * froth

    droplets = bubbling(cycles=47.0, low_hz=1670, octaves=2.26, rise=0.0026,
                        tilt_db=-5.5, spread_db=5.5, count=900) * amp(-3.0)
    clumps = amp(5 * (1 - .7 * churned) * drift(30))   # drops fly in clumps, more evenly when churned
    scattered = [grains(7000 * clumps, 2.6), grains(7000 * clumps, 2.05)]
    spraying = patchy(scattered, SPRAY_SPECTRUM, patchy_db=-1.0, rate=41.0)
    aside, ahead = spray * spraying * amp(1.5)
    hiss = rms_one(resonate(grains(4000, 3.9), 10000, 7000))
    mist = (1 - churned) * spray * hiss * amp(-17.0)   # finest drops

    # two differently placed parts widen the splash
    body = slosh * low + bubbles * middle + aside + glides(GULPS_THUMPS_SLAPS) + bursts()
    top = ahead * amp(-1.5) + spray * droplets + mist
    return place(body, pan_db=-2.0, lag_s=6.5e-5) + place(top, pan_db=-4.0, lag_s=2e-5)


def scene():
    """All sources summed at the two ports."""
    background = river() + rumble()
    tackle = knocks() + hands() + ticks()
    water = plinks() + spits() + drops() + fish()
    return background + tackle + water


def record(dry):
    """High-pass at 14 Hz; low-pass that reaches -70 dB at 15.95 kHz."""
    dry = signal.sosfilt(signal.butter(2, 14, "high", fs=SR, output="sos"), dry)
    return signal.sosfilt(signal.cheby2(12, 70, 15950, fs=SR, output="sos"), dry)


dry = scene()
out = record(dry)
master_out(out)
```